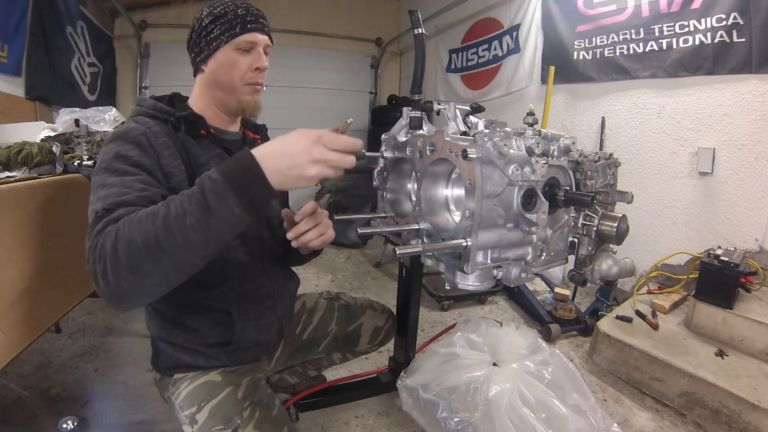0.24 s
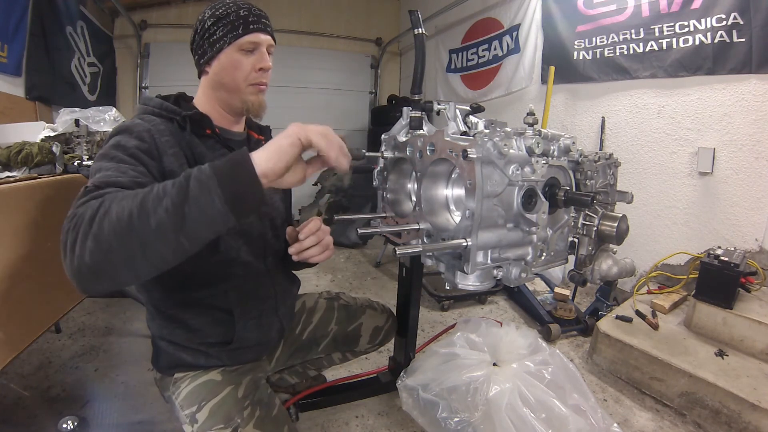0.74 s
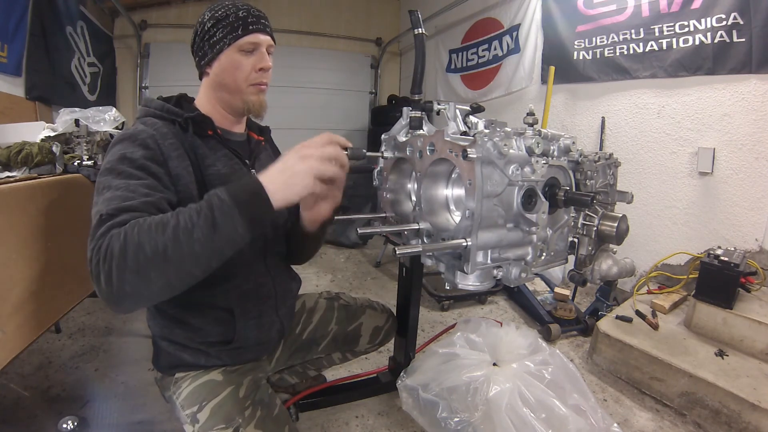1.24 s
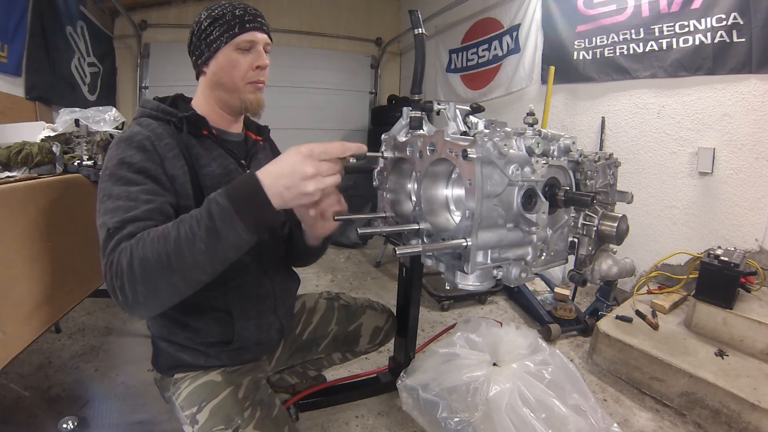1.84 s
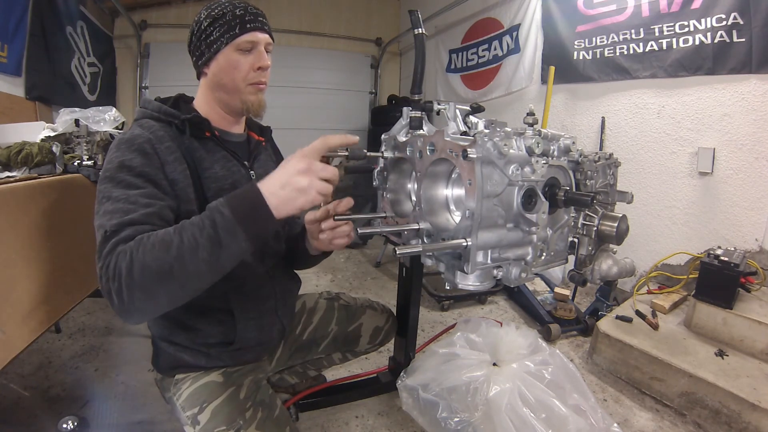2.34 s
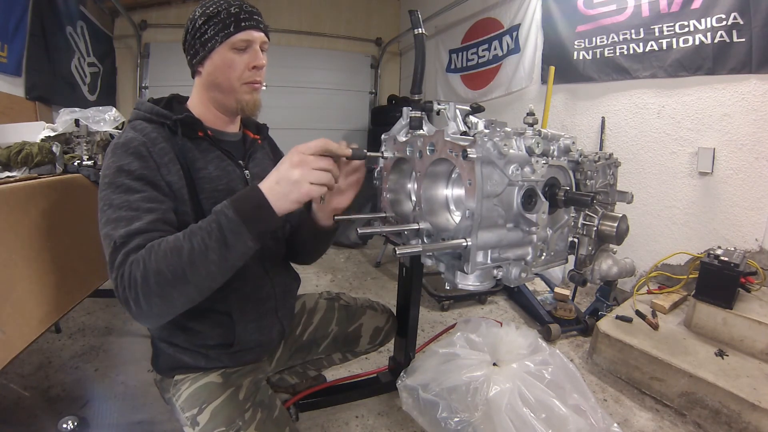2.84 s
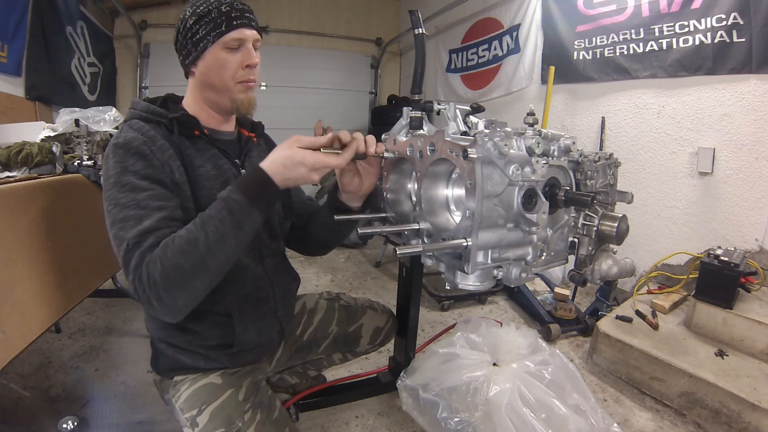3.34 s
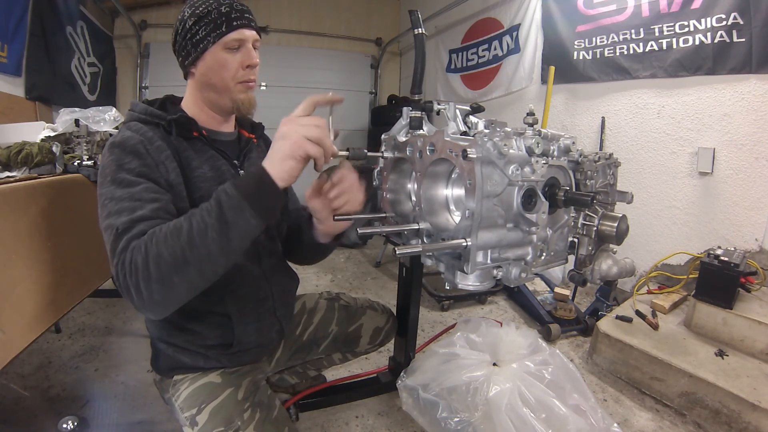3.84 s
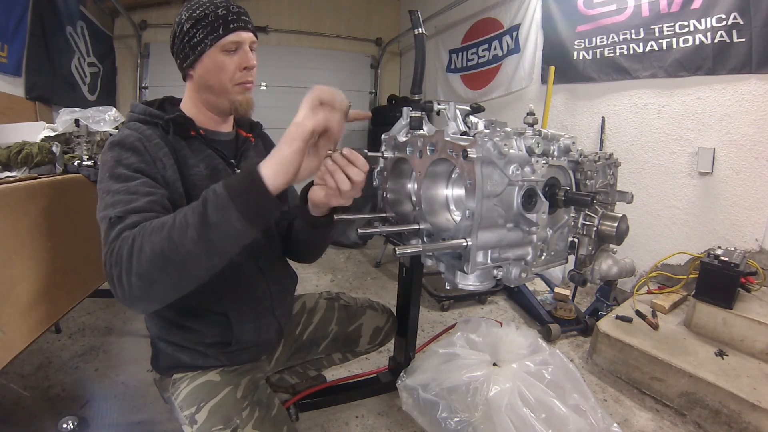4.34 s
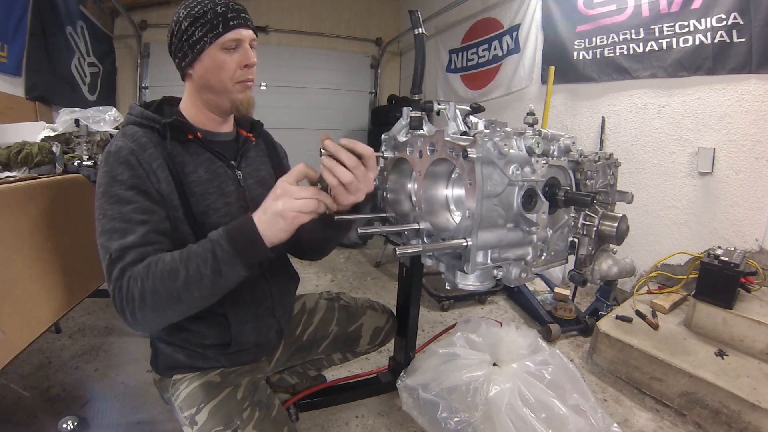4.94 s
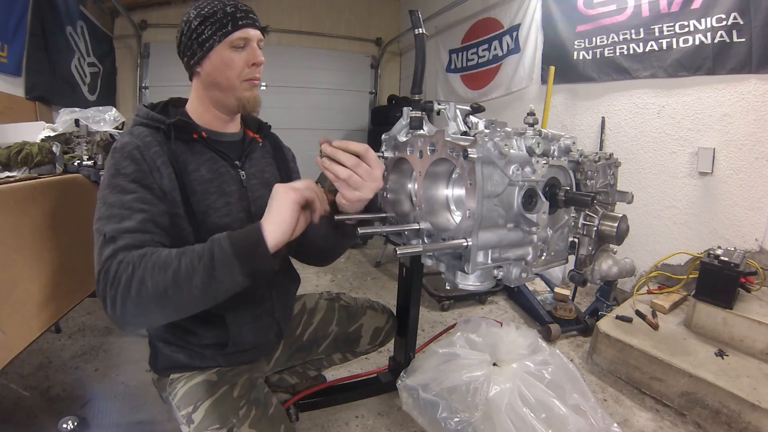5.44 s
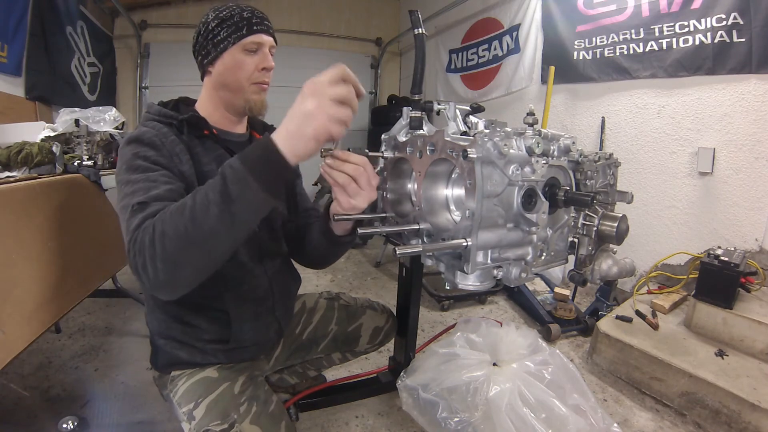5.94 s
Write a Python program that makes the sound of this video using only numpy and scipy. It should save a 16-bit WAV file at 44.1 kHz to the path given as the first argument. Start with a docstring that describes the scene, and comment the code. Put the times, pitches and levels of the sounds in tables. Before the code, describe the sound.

A quiet garage with a steady, faint low rush of air, recorded close to a metal engine block while a thread tap is turned by hand. At 0.05 and 0.14 s two loud, piercing, very high squeaks sound, with weaker chirps trailing to 0.5 s. Around 1.0 to 1.3 s a rough cluster of softer chirps comes with faint gritty scraping. Near 1.9 to 2.0 s quick chirps build to a loud one, then tiny scrapes. Weak squeaks follow at 2.5 to 2.7 s; then it is nearly still, with a faint chirp at 3.6, another at 4.25 and a pair at 4.9 s. At 5.1 s a longer squeal, about a tenth of a second, jumps up, holds and sags. Quiet until a last loud sharp squeak at 6.1 s. Each rings briefly in the room; the loudest carry harsh low buzzing distortion.

```python
"""A thread tap is turned by hand in an aluminium engine block in a quiet garage, over a steady low rush of air.
By stick-slip its flutes give short, very high squeaks, with faint gritty scrapes of crushed chips between.
After five seconds comes one longer squeal, whose pitch rises, holds and sags; a last squeak follows at six.
By reflection the garage rings after each sound; by clipping and aliasing the loudest fold into low buzzes."""
import sys
import numpy as np
from scipy import signal
from scipy.fft import rfft, irfft, next_fast_len
from scipy.io import wavfile

SR = 44100
rng = np.random.default_rng(int(sys.argv[2]) if len(sys.argv) > 2 else 0)


def generate_wav(signal):
    """Clip the signal to [-1, 1] and save it as 16-bit WAV at the path in sys.argv[1]."""
    frames = np.transpose(np.atleast_2d(signal))
    scaled = np.clip(frames, -1, 1) * 32767
    pcm = np.round(scaled).astype(np.int16)
    wavfile.write(sys.argv[1], SR, pcm)


N = 273046

# Short slips of the tap: (time [s], length [s], starting pitch [Hz], settled pitch [Hz],
# level towards the end [dB], roughness [1], octave relative to fundamental [dB])
SQUEAKS = [ (.053, .032, 10270, 10070, -5, .06, -39), (.138, 0.022, 9845, 9754, -4.5, 0.1, -42),
           (.157, .02, 9635, 8356, -13, 0.3, -29), (.252, 0.036, 4563, 4665, -54.5, 0.52, -35),
           (0.474, .022, 8036, 8190, -19, 0.12, -30.5), (1.020, .038, 7316, 8285, -17, 0.7, -26),
           (1.205, .026, 4003, 3867, -41, 1.06, -19), (1.241, 0.014, 8690, 7630, -18.5, 0.46, -30),
           (1.261, .022, 6730, 6270, -17.5, 0.01, -9.5), (1.290, 0.0196, 6180, 6770, -24.5, 0.54, -21),
           (1.867, .02, 7250, 7180, -29.5, .4, -35), (1.899, 0.023, 7200, 7000, -28, 0.7, -20),
           (1.969, .015, 7560, 7705, -31, 0.65, -22.5), (1.993, .009, 7650, 7860, -12.5, .2, -36),
           (1.998, .02, 7750, 7586, -4.5, .2, -18), (2.02, .011, 7770, 8380, -19, 0.5, -40),
           (2.086, 0.05, 4132, 2200, -46, 1.23, -16.5), (2.511, 0.015, 3600, 3373, -48, 1, -25),
           (2.568, 0.017, 7186, 7283, -19.5, 0.63, -16.5), (2.615, 0.0131, 10260, 8900, -22.5, 1.03, -22.5),
           (2.704, 0.0218, 7120, 6710, -30, 0.07, -16), (3.577, .019, 9190, 8950, -22, 0.39, -32),
           (4.181, .06, 4130, 3997, -48.5, 0.9, -19), (4.253, .02, 7060, 8685, -16.5, 0.26, -26.5),
           (4.834, 0.067, 4000, 3872, -42, .1, -24), (4.921, .017, 4720, 5027, -15.5, 0.2, -10),
           (4.942, 0.02, 7970, 8580, -19, 0.28, -31.5), (6.091, 0.012, 9470, 9530, -20, .45, -40),
           (6.098, .017, 9600, 10530, -2.5, .13, -40), ]
SETTLE_POWER = 2.1  # the higher, the sooner a squeak reaches its settled pitch
BUILD_SHARE = 0.12  # part of a squeak spent building up
GROWTH_DB = 5  # growth from start to end of a squeak, beneath its rise and release
RELEASE_S = 0.0058

# Course of the one long slip: (time [s], pitch [Hz], level [dB])
SQUEAL_COURSE = [ (5.101, 8900, -17), (5.108, 9200, -15), (5.110, 10300, -4), (5.117, 10450, -7),
                 (5.119, 10795, -1), (5.124, 10805, -1), (5.126, 10950, -16), (5.133, 11280, -8.5),
                 (5.158, 11360, -14), (5.179, 10900, -15), (5.185, 10800, -2.5), (5.190, 10790, -2),
                 (5.192, 10050, -14), (5.203, 9270, -11), ]
SQUEAL_ROUGH, SQUEAL_OCTAVE_DB = 0.1, -42.5

# Chips grinding in the thread: (time [s], length [s], centre frequency [Hz], level [dB])
SCRAPES = [ (1.006, 0.0072, 5650, -46), (1.203, 0.039, 2390, -48.5), (1.225, .009, 4920, -49),
           (1.515, 0.0066, 5940, -59), (1.687, 0.0076, 6980, -49), (2.095, 0.02495, 2800, -47),
           (2.110, 0.0073, 6600, -45), (2.617, .021, 3120, -54), (3.093, .005, 7400, -54.5),
           (3.525, 0.035, 3390, -59), (3.590, 0.043, 4470, -56), ]
SCRAPE_SPREAD = 0.7  # bandwidth as a share of the centre frequency

# Reflections from nearby faces of the block, wall and floor: (delay [s], level [dB])
ECHOES = [(.0031, -23), (.0057, -15), (.0094, -6.5), (0.015, -15.5), (0.0247, -23)]
# Reverberation time of the garage: (frequency [Hz], time to fall by 60 dB [s])
REVERB_TIMES = [(300, 0.41), (2000, 0.59), (5000, .39), (8000, 0.34), (11000, 0.24), (15000, 0.11)]

# Faint mirror images: frequencies from which each pitch is subtracted: (frequency [Hz])
MIRROR_HZ = [12100, 16000, 20000, 24200]
# Strength of each mirror image in the same order: (level [dB])
MIRROR_DB = [-26.5, -46, -32.5, -29.5]

# Spectral shape of the room's rush: (frequency [Hz], relative density [dB])
AIR_SPECTRUM = [(12, -17.5), (20, 1.5), (32, -1.5), (55, -8), (85, -6.5), (162, -15), (355, -13.5),
                (554, -17.5), (1250, -23.5), (1740, -27.5), (3040, -33), (3400, -35.5), (6650, -38.5),
                (12600, -43), (15800, -48)]
# Stereo width of the rush: (frequency [Hz], side minus mid [dB])
AIR_SIDE = [(60, -18), (240, -19.5), (950, -17), (3770, -7.5), (15000, -10)]
AIR_DB = -45  # rms level of the rush

CONVERTER_RATE, EDGE_HZ = 32000, 15600  # sample rate at which clipping occurs; final band limit


def gain_of(db):
    """Logarithmic level: decibels become an amplitude ratio."""
    return 10 ** (np.asarray(db) / 20)


def evened(x):
    """Power normalisation: the root mean square becomes one."""
    return x / np.sqrt(np.mean(x ** 2) + 1e-20)


def read(points, hz):
    """Log-frequency interpolation of a table."""
    table_hz, value = np.transpose(points)
    return np.interp(np.log(hz + 1), np.log(table_hz + 1), value)


def add(mix, start_s, sound):
    """Superposition: a sound is summed into the mix at its start time."""
    part = mix[round(start_s * SR):][:len(sound)]
    part += sound[:len(part)]


def band_noise(centre_hz, width_hz, size=8192):
    """Spectral filtering: white noise passes one bell-shaped band and is scaled to rms one."""
    hz = np.fft.rfftfreq(size, 1 / SR)
    bell = 1 / (1 + ((hz - centre_hz) / width_hz * 2) ** 4)
    return evened(irfft(rfft(rng.standard_normal(size)) * bell))


def swell(t, length, rise, fall):
    """Amplitude envelope: squared-sine rise and fall, each lasting the given seconds."""
    nearest_edge = np.minimum(t / rise, (length - t) / fall)
    return np.sin(np.pi / 2 * np.clip(nearest_edge, 0, 1)) ** 2


def stick_slip(glide, rough, octave_db, jitter=0.042, flutter=0.35, least_flutter=0.15, rasp_db=-42):
    """Stick-slip friction: one mode of the tap is driven; uneven grip shakes its pitch and strength."""
    size = len(glide)
    shake = band_noise(0, width_hz=1400)[:size]
    grip = band_noise(0, width_hz=780)[:size]
    phase = 2 * np.pi * np.cumsum(glide * (1 + jitter * rough * shake)) / SR
    tone = np.zeros(size)
    for k, db in enumerate([0, octave_db, octave_db - 17.5], 1):
        if k * glide.mean() < SR / 2:
            tone += gain_of(db) * np.sin(k * phase)
    strength = np.exp((least_flutter + flutter * rough) * grip)
    rasp = gain_of(rasp_db) * rough * band_noise(centre_hz=7980, width_hz=6100)[:size]
    return evened(tone * strength + rasp)


def squeak(length, start_hz, settled_hz, db, rough, octave_db):
    """Short stick-slip: the tone builds up while its pitch slides to a steady note, then stops short."""
    t = np.arange(0, length, 1 / SR)
    remaining = abs(1 - t / length)
    glide = settled_hz + (start_hz - settled_hz) * remaining ** SETTLE_POWER
    level = gain_of(db + GROWTH_DB * (t / length - 1))
    envelope = swell(t, length, rise=BUILD_SHARE * length, fall=RELEASE_S)
    return level * stick_slip(glide, rough, octave_db) * envelope


def squeal(rise_s=0.0014):
    """Sustained stick-slip: pitch and strength follow the hand; returns start time and sound."""
    s, hz, db = np.transpose(SQUEAL_COURSE)
    length = s[-1] - s[0]
    t = np.arange(0, length, 1 / SR)
    tone = stick_slip(np.interp(s[0] + t, s, hz), SQUEAL_ROUGH, SQUEAL_OCTAVE_DB)
    level = gain_of(np.interp(s[0] + t, s, db))
    return s[0], level * tone * swell(t, length, rise=rise_s, fall=RELEASE_S)


def scrape(length, centre_hz, db):
    """Granular fracture: chips crushed under the flutes give a grainy puff of band noise."""
    t = np.arange(0, length, 1 / SR)
    grit = np.exp(0.5 * band_noise(0, width_hz=1800))
    hiss = band_noise(centre_hz, SCRAPE_SPREAD * centre_hz)
    puff = evened((grit * hiss)[:len(t)])
    return gain_of(db) * puff * swell(t, length, rise=0.00052, fall=0.003)


def garage(x, tail_db=-6, build_s=0.0081):
    """Room reflection: direct sound, near echoes and a diffuse tail, its decay set by frequency."""
    hz, t, spectrum = signal.stft(rng.standard_normal(SR // 2), SR, nperseg=256)
    decay = gain_of(-60 * t / read(REVERB_TIMES, hz)[:, None])
    tail = signal.istft(spectrum * decay, SR, nperseg=256)[1]
    # the diffuse field takes a moment to build up
    tail *= 1 - np.exp(-(np.arange(len(tail)) / SR / build_s) ** 2)
    response = gain_of(tail_db) * tail / np.linalg.norm(tail)
    response[0] += 1  # direct sound
    for delay, db in ECHOES:
        response[round(delay * SR)] += gain_of(db)
    return signal.fftconvolve(x, response)[:N]


def ghosts(x, above_hz=3500):
    """Heterodyning: the treble is mirrored to each mirror frequency minus its own."""
    size = next_fast_len(N)
    above = np.fft.rfftfreq(size, 1 / SR) > above_hz
    # positive frequencies alone give the analytic (complex) treble
    treble = np.fft.ifft(2 * rfft(x, size) * above, size)[:, :N]
    t = np.arange(N) / SR
    carriers = sum(gain_of(db) * np.exp(2j * np.pi * hz * t) for hz, db in zip(MIRROR_HZ, MIRROR_DB))
    return (carriers * treble.conj()).real


def air():
    """Coloured noise: the steady low rush of the room, nearly the same in both channels."""
    size = next_fast_len(N)
    hz = np.fft.rfftfreq(size, 1 / SR)
    mid, side = rfft(rng.standard_normal((2, size))) * gain_of(read(AIR_SPECTRUM, hz))
    side = side * gain_of(read(AIR_SIDE, hz))
    left_right = irfft(np.array([mid + side, mid - side]), size)[:, :N]
    return gain_of(AIR_DB) * evened(left_right)


def scene():
    """Superposition: the tap sounds straight ahead in the garage, over the air."""
    tap = np.zeros(N)
    for start_s, *row in SQUEAKS:
        add(tap, start_s, squeak(*row))
    add(tap, *squeal())
    for start_s, *row in SCRAPES:
        add(tap, start_s, scrape(*row))
    return garage(tap) + air()


def record(dry, ceiling=0.56, knee=9, lopsided=0.025):
    """Clipping and aliasing: overtones made at a low sample rate fold down; a band limit follows."""
    seconds = N // SR + 1  # whole seconds keep the resampling ratio exact
    padded = np.pad(dry + ghosts(dry), ((0, 0), (0, seconds * SR - N)))
    sampled = signal.resample(padded, seconds * CONVERTER_RATE, axis=1)
    limit = ceiling * (1 + lopsided * np.sign(sampled))  # slightly unequal for the two signs
    clipped = sampled / (1 + abs(sampled / limit) ** knee) ** (1 / knee)
    out = signal.resample(clipped, seconds * SR, axis=1)[:, :N]
    low_pass = signal.firwin(511, EDGE_HZ, window=("kaiser", 9), fs=SR)
    return signal.oaconvolve(out, low_pass[None], "same")


dry = scene()
out = record(dry)
generate_wav(out)
```